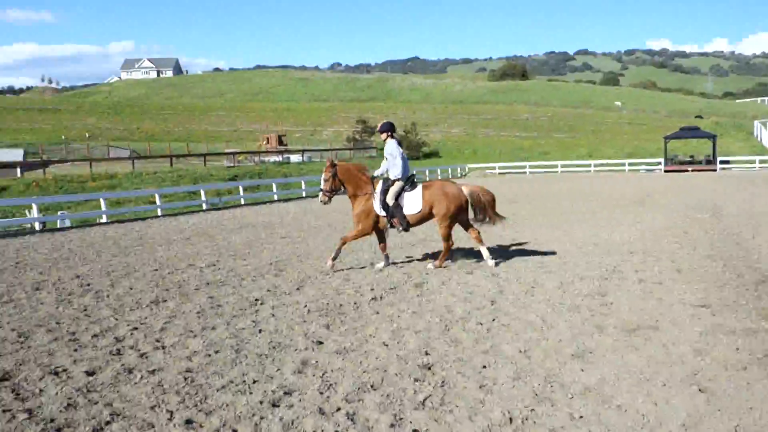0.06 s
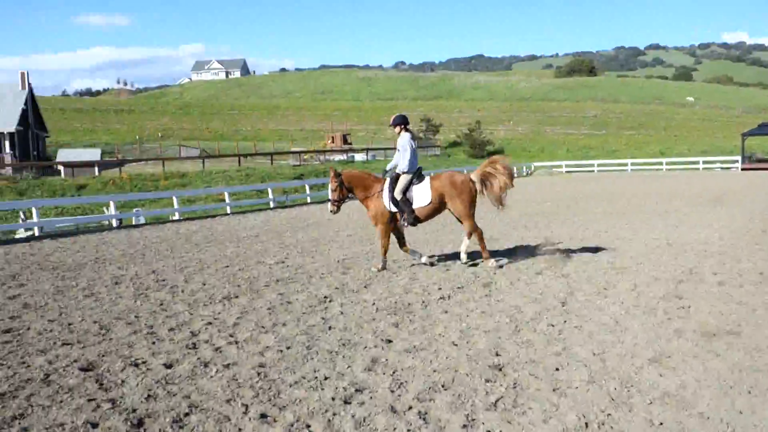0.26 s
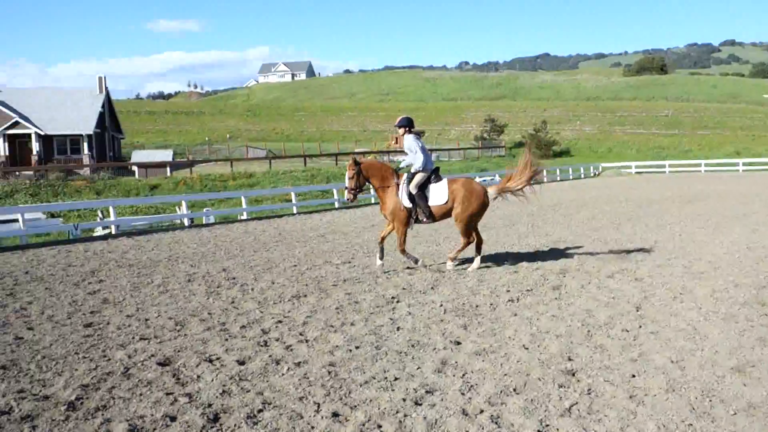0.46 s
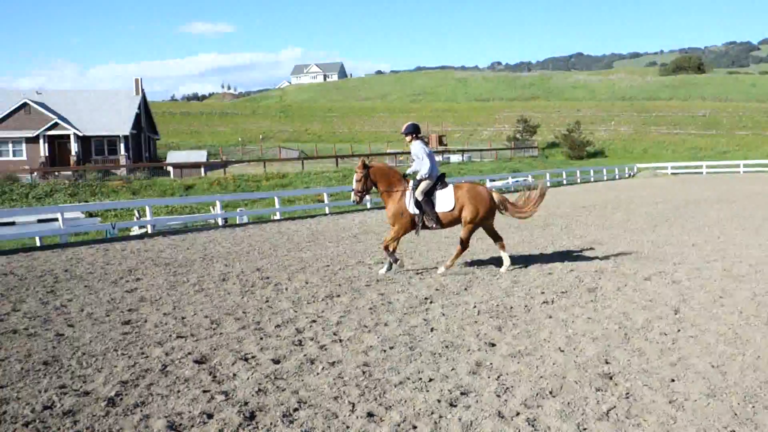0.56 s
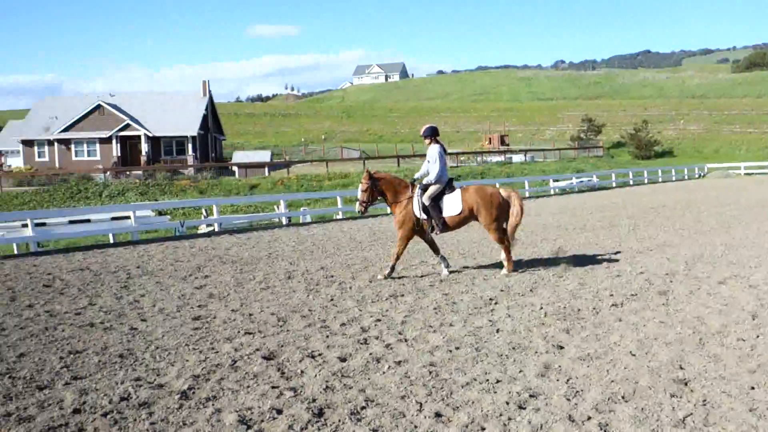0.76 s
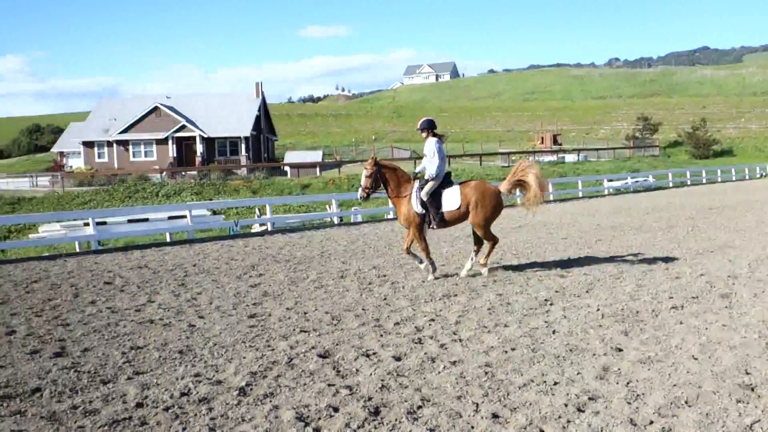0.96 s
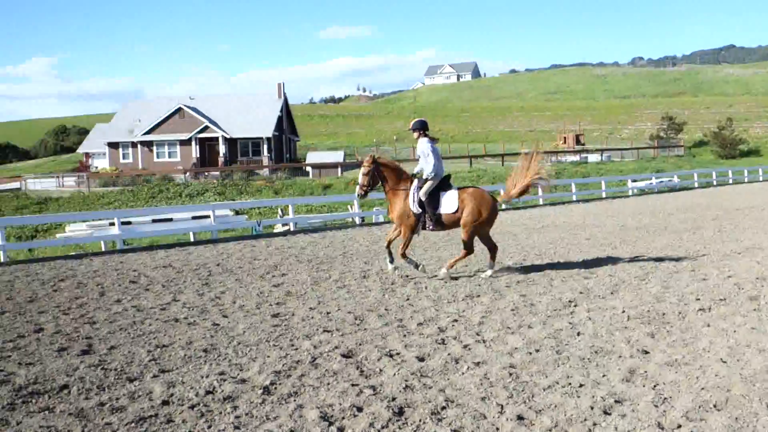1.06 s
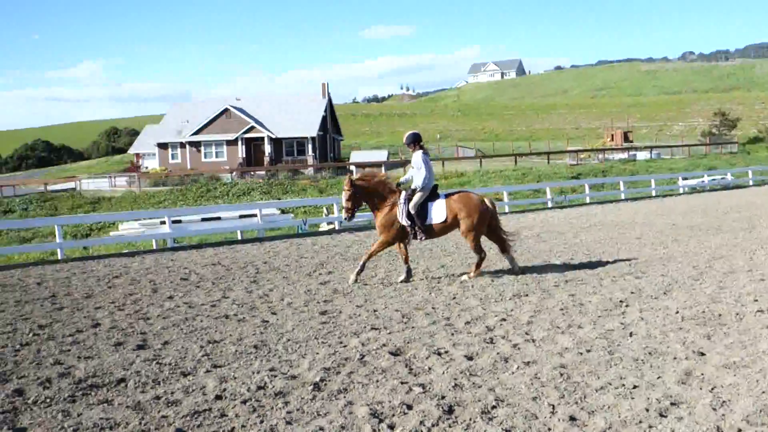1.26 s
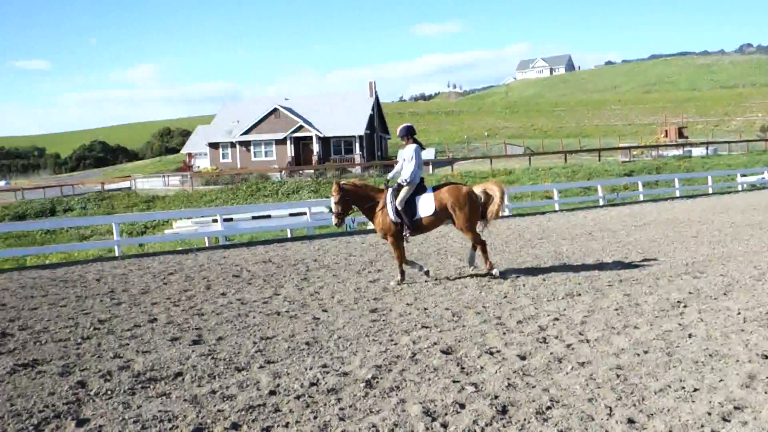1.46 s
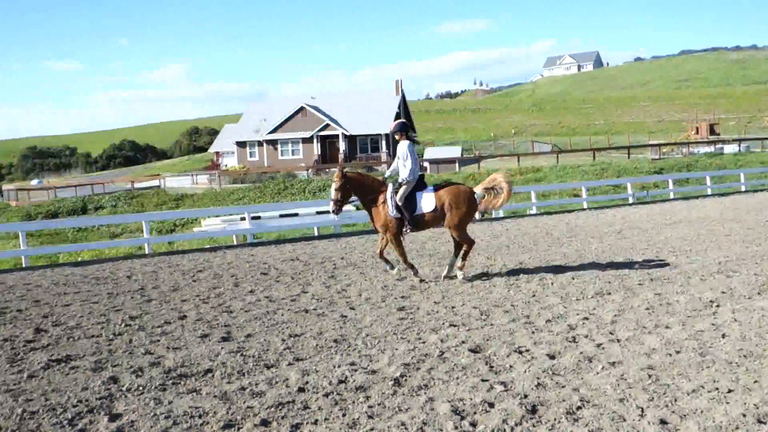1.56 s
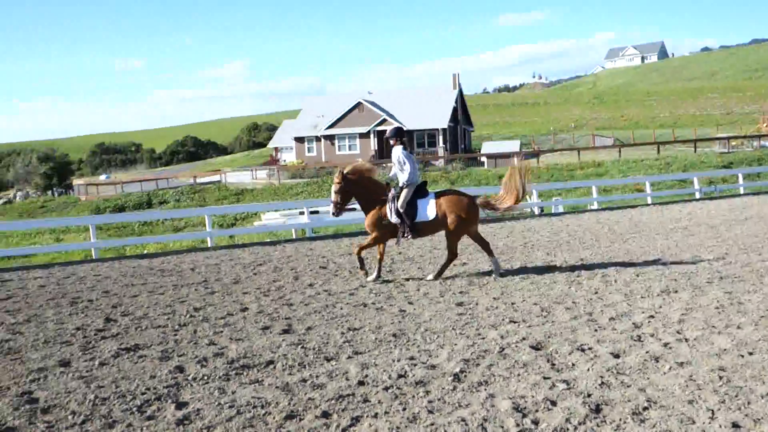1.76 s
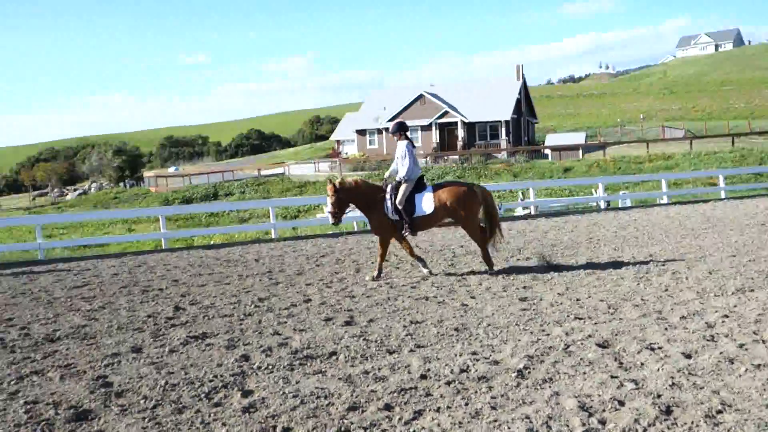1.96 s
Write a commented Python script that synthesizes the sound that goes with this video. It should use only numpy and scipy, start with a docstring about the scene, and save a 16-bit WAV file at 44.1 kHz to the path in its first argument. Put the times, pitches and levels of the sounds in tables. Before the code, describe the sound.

Outdoors, gusts slap an unprotected microphone with hollow low roar, easing midway, then returning; some distance off a cantering horse gives muffled thuds on sand, with light gritty hiss, close dry ticks and faint thin whistles.

```python
"""A sand arena in gusty wind: a pony canters round it, some way from the microphone.
Coloured noise makes the wind's roar, rumble and flutter on two microphone ports; gliding tones make it
hoot, and single pulses make it buffet. Under it hooves thud as pulses and noise bursts, and sand hisses.
Dry ticks of pulse and noise sound close by, with a ringing clack and a soft swish of noise.
Two thin wavering sine whistles, probably birds, come from far off."""
import sys
import numpy as np
from scipy import signal
from scipy.fft import rfft, irfft
from scipy.io import wavfile
from scipy.ndimage import uniform_filter1d, minimum_filter1d

SR = 44100
rng = np.random.default_rng(int(sys.argv[2]) if len(sys.argv) > 2 else 0)


def transcribe(u):
    """Save the signal u as a 16-bit wav file named by the first command-line argument.

    u: samples, shape (n,) or (channels, n), limited to [-1, 1]; the rate is SR.
    q: integer samples, one column per channel.
    """
    v = np.clip(np.atleast_2d(u).T, -1, 1)
    q = np.round(v * 32767).astype(np.int16)
    wavfile.write(sys.argv[1], SR, q)


N = 88949

# Every colour table is a spectrum shape: pitch_hz, relative_db
# Open air behind everything
AIR_COLOUR = [(60, 0.5), (400, -3), (1000, -13), (2000, -7.5), (5000, -12), (15000, -73.5)]
AIR_DB = -79.5

# Far whistles: start_s, length_s, pitch_hz (before waver), level_db (before flicker)
WHISTLES = [(0.604, 0.11, 2394, -67), (1.908, 0.15, 4780, -68.5)]
WHISTLE_WAVER, WHISTLE_FLICKER_DB = 0.062, 6  # waver: rms share of the pitch

# Sand hiss and hoof spray
SAND_COLOUR = [(900, -7.5), (1800, 3), (2900, 6), (4500, 1), (7000, 0.5), (11500, 0), (14000, -7.5),
               (16000, -13.5)]
# Sand hiss over time: time_s, level_db (before the trim)
HISS_LEVEL = [(0, -73.5), (.16, -70.5), (.23, -65), (.37, -78.5), (.58, -67.5), (.63, -62), (.71, -67.5),
              (.77, -63.5), (.83, -65), (.87, -65), (1.05, -68.5), (1.08, -55), (1.12, -62), (1.39, -57.5),
              (1.5, -64), (1.8, -64), (2.02, -57.5)]
HISS_TRIM_DB, HISS_GRAIN_DB = -5.5, 1
TREBLE_PAN_DB, TREBLE_SIDE_DB = -3.5, -5.5  # left minus right; side noise against shared noise

# One airy swish, sand or cloth; the half length runs from the middle to a fall of 1 / e
SWISH_S, SWISH_HALF_S, SWISH_DB = 0.775, 0.036, -60

# Dry ticks near the microphone: time_s, snap_peak_db, scatter_peak_db, scatter_decay_s,
# ring_share (signed ratio, before the ring's own level)
TICKS = [(.415, -43, -46.5, 0.0034, 0.5), (0.592, -39.5, -42, 0.008, 0), (0.61, -45.5, -42.5, 0.0014, -2),
         (0.64, -45.5, -43, 0.0036, .5), (.898, -45, -45, 0.0034, 0), (0.9827, -33.5, -36.5, 0.0039, 0),
         (0.987, -34, -35, .002, 0.1), (1.0416, -36, -33.5, 0.0053, 0.5),
         (1.1615, -30.5, -33.5, 0.0054, -0.12), (1.6212, -34.5, -35.5, 0.0035, 0.8),
         (1.664, -43.5, -39, 0.0026, 0), (1.746, -44.5, -38.5, .005, 1), (1.8734, -33.5, -45, 0.0024, 5)]
TICK_COLOUR = [(1200, -21), (2600, -6), (4300, -6), (6000, -2.5), (8500, -1), (12000, 0.5), (14000, -5),
               (16000, -7)]
TICK_ATTACK_S, TICK_RING_HZ, TICK_RING_WIDTH_HZ = 0.0013, 2900, 1200

# One clack, a hoof or the tack, and its rebound: start_s, peak_db
CLACKS = [(1.405, -32.5), (1.4115, -46)]
# Resonances of the clack: pitch_hz, width_hz, relative_db
CLACK_MODES = [(1140, 150, 9), (1800, 56, -1), (2247, 300, 5), (2830, 130, 13), (3280, 150, 7.5),
               (3820, 500, -4.5), (4900, 700, -13)]
CLACK_DECAY_S = 0.0022

# Hoof falls: start_s, thud_peak_db (before the lean), spray_peak_db
HOOVES = [(0.095, -49, -50), (.215, -19.5, -49), (.247, -28, -50), (0.631, -18.5, -61),
          (0.668, -18.5, -52.5), (0.753, -30.5, -66), (.822, -22, -46), (0.894, -46.5, -64),
          (0.991, -27, -70), (1.106, -29, -68), (1.264, -24.5, -46), (1.389, -21, -69),
          (1.836, -34.5, -40.5)]
THUD_COLOUR = [(15, -18), (110, -2.5), (260, 6), (450, 2), (750, -19), (1400, -51.5), (8000, -81)]
THUD_ATTACK_S, THUD_DECAY_S = 0.00303, 0.014
SPRAY_ATTACK_S, SPRAY_DECAY_S = 0.0037, 0.01

# Hollow tones drawn from the ports: start_s, length_s, first_pitch_hz, last_pitch_hz (before waver),
# level_db (before flicker)
HOOTS = [(0.033, 0.12, 384.4, 430, -27), (0.23, 0.099, 394, 350, -30), (0.308, 0.11, 254, 368.3, -22),
         (0.399, .08, 334.3, 386.5, -24.5), (0.432, .07, 216.3, 129, -24.5),
         (1.09, 0.083, 245.2, 221.7, -21.5), (1.304, 0.14, 138, 141, -27.5), (1.438, 0.15, 168, 229, -26.5),
         (1.549, 0.067, 225.3, 291, -19.5), (1.553, 0.115, 165.1, 78, -25.5), (1.637, 0.2, 105, 213.3, -25),
         (1.73, 0.073, 325, 284, -24), (1.824, 0.12, 305, 376, -25.5), (1.86, .085, 206.4, 176.6, -17.5)]
HOOT_WAVER, HOOT_FLICKER_DB, HOOT_SIDE_DB = 0.04, 3.5, -12  # waver: rms share of the pitch

# Sharp wind buffets: time_s, push_peak_db, crack_peak_db (both before the random lean)
BUFFETS = [(.006, -29, -38), (.103, -24.5, -30), (.137, -18.5, -38), (.158, -13, -31), (0.177, -13, -36),
           (.226, -20.5, -54), (.252, -19.5, -34), (.281, -13, -38), (.319, -16.5, -34),
           (.337, -18.5, -39.5), (.373, -9, -32.5), (.403, -16, -35), (.482, -20.5, -38),
           (1.546, -16, -39.5), (1.650, -17.5, -46.5), (1.684, -17, -26.5), (1.713, -22.5, -38.5),
           (1.7366, -27, -43.5), (1.751, -22.5, -37.5), (1.766, -18, -33.5), (1.775, -13, -39.5),
           (1.794, -25, -38)]
# The dull push of a buffet
BUFFET_COLOUR = [(20, -36.5), (90, -13), (300, 5.5), (520, -5), (800, -19), (1300, -41), (5000, -89.5)]
# The crack on top of it
CRACK_COLOUR = [(100, -27), (850, 7.5), (1500, 3), (2300, -10), (3100, -22.5), (7000, -32), (15000, -55.5)]

# Wind roar over time: time_s, level_db (before the trim and the brightness balance)
ROAR_LEVEL = [(0.0, -15), (0.03, -34), (0.11, -24), (0.13, -30.5), (0.18, -15.5), (0.2, -41.5),
              (0.22, -24.5), (0.36, -22), (0.48, -23), (0.5, -31), (0.59, -32), (0.61, -28), (0.68, -25),
              (0.7, -48), (0.73, -36), (0.77, -33), (0.8, -48.5), (0.82, -24.5), (0.88, -61.5), (0.9, -33),
              (0.93, -71), (0.96, -29.5), (1.0, -21.5), (1.04, -30.5), (1.09, -35.5), (1.11, -26),
              (1.15, -21), (1.17, -28), (1.32, -31), (1.41, -28.5), (1.5, -28.5), (1.58, -26.5),
              (1.62, -30.5), (1.77, -20), (1.81, -23.5), (1.89, -20.5), (1.94, -21), (1.96, -13),
              (2.02, -25)]
ROAR_COLOUR = [(20, -52.5), (60, -24.5), (120, -10), (180, 2), (260, -0.5), (370, -3), (480, -9),
               (620, -20.5), (800, -31.5), (1300, -53), (5000, -85.5)]
# Lift of the roar's upper part: time_s, lift_db (before the brightness balance)
BRIGHTNESS = [(0, 5), (.09, 10), (.22, 0), (.37, 11), (.46, -1.5), (.82, -1), (1.0, 4.5), (1.14, 0.5),
              (1.35, -4.5), (1.62, -5.5), (1.76, -3), (2.02, 2)]
BRIGHT_HZ = 340
# The wind's deepest rumble over time: time_s, level_db (before the trim)
RUMBLE_LEVEL = [(0, -41.5), (.045, -26), (.075, -36), (.125, -26), (.18, -32), (.215, -29.5), (.28, -26.5),
                (.35, -33), (.41, -35.5), (.49, -30), (.54, -27.5), (.58, -55), (.61, -28.5), (.68, -22.5),
                (.705, -45.5), (.8, -43), (.83, -24), (.86, -47.5), (.93, -47.5), (.97, -29.5),
                (1.0, -17.5), (1.05, -39.5), (1.13, -32.5), (1.2, -41.5), (1.3, -27.5), (1.36, -30.5),
                (1.48, -27), (1.74, -28.5), (1.86, -30.5), (2.02, -29)]
RUMBLE_COLOUR = [(12, -36.5), (30, -21.5), (55, -9), (90, -2.5), (130, 0), (175, -4.5), (260, -41.5),
                 (900, -81.5)]
# The wind's rough upper edge over time: time_s, level_db (before trims and pan)
FLUTTER_LEVEL = [(0, -44), (.06, -75), (.11, -45), (.14, -64), (.17, -39), (.195, -58.5), (.24, -59),
                 (.29, -42.5), (.36, -53.5), (.42, -57.5), (.46, -62.5), (.485, -45.5), (.51, -66.5),
                 (.59, -79), (.64, -58), (.68, -58), (.71, -79), (.76, -66), (.8, -84), (.825, -68),
                 (.86, -79), (.94, -78), (.985, -51.5), (1.06, -70.5), (1.14, -58), (1.21, -64),
                 (1.45, -66.5), (1.55, -52), (1.63, -64.5), (1.70, -51.5), (1.77, -47.5), (1.83, -54.5),
                 (2.02, -47)]
FLUTTER_COLOUR = [(100, -41), (500, -1.5), (700, -8), (900, -2), (1250, -6), (1800, -13.5), (3000, -37),
                  (12000, -67.5)]
# Pops inside the flutter
CRACKLE_COLOUR = [(100, -33), (600, 6.5), (900, 1), (1300, -1.5), (1900, -17), (2600, -24.5), (4000, -31.5),
                  (12000, -68)]
# Difference between the two ports: pitch_hz, side_minus_mid_db
PORT_SIDE = [(30, -22), (80, -17.5), (170, -14), (340, -5.5), (700, -3.5), (1400, 0)]
ROAR_TRIM_DB, RUMBLE_TRIM_DB, FLUTTER_TRIM_DB, CRACKLE_TRIM_DB = 1, -1, -11.5, -0.5
EDDY_RATE_HZ, EDDY_SPREAD_DB, FLUTTER_SPREAD_DB, STEADY_S = 110, 3, 8, 0.03
CRACKLE_RATE_HZ, CRACKLE_SPREAD_DB = 130, 4.5  # mean pops a second in each of three streams
FLUTTER_PAN_DB = 3  # left minus right
PORT_LAG_S = 0.00033  # eddies reach the right port first

CEILING, TOP_HZ = 0.31, 15800  # limiter threshold in full scale; low-pass edge


def undb(db):
    """Decibels to gain."""
    return 10 ** (np.asarray(db) / 20)


def seconds():
    """The time of every sample."""
    return np.arange(N) / SR


def curve(rows):
    """Gain along (time_s, level_db) points."""
    return undb(np.interp(seconds(), *np.array(rows).T))


def gains(points):
    """Gain at every frequency from (pitch_hz, level_db) points."""
    hz, db = np.array(points).T
    bins_hz = np.fft.rfftfreq(N, 1 / SR)
    return undb(np.interp(np.log(bins_hz + 1), np.log(hz), db))


def colour(x, points):
    """Filter to a spectrum shape, keeping the power of white noise."""
    g = gains(points)
    return irfft(rfft(x) * g / np.sqrt(np.mean(g ** 2)), N)


def walk(rate_hz):
    """Random levels held 1 / rate_hz and smoothed twice, with unit deviation."""
    hold = max(int(SR / rate_hz), 1)
    steps = rng.standard_normal(N)[np.arange(N) // hold]
    smooth = uniform_filter1d(uniform_filter1d(steps, hold), hold)
    return smooth / smooth.std()


def burst(start_s, attack_s, decay_s):
    """A linear rise and an exponential fall."""
    age = seconds() - start_s
    return np.clip(age / attack_s, 0, 1) * np.exp(-np.maximum(age - attack_s, 0) / decay_s)


def peak(x, db):
    """Scale to a peak level."""
    return x * undb(db) / np.abs(x).max()


def pan(db):
    """Left and right gains that differ by db."""
    return undb(np.array([[db], [-db]]) / 2)


def slap(time_s, points, db, lean):
    """One pressure pulse swinging both ways about time_s, unequal on the two ports."""
    delay = np.exp(-2j * np.pi * np.fft.rfftfreq(N, 1 / SR) * time_s)
    pulse = irfft(gains(points) * delay * 1j, N)
    return peak(pulse, db) * (1 + lean * np.array([[1], [-1]]))


def ring(x, modes):
    """Pass through damped (pitch_hz, width_hz, relative_db) resonances of alternating sign."""
    hz = np.fft.rfftfreq(N, 1 / SR)
    body = 0
    for k, (pitch_hz, width_hz, db) in enumerate(modes):
        body = body + (-1) ** k * undb(db) / (1 + 2j * (hz - pitch_hz) / width_hz)
    return irfft(rfft(x) * body, N)


def port_noise():
    """Noise on two ports, alike in the bass and more unlike higher up."""
    mid, side = rng.standard_normal((2, N))
    side = irfft(rfft(side) * gains(PORT_SIDE), N)
    return np.array([mid + side, mid - side])


def treble_noise():
    """Mostly shared noise that leans to the right."""
    mid, side = rng.standard_normal((2, N))
    side = side * undb(TREBLE_SIDE_DB)
    return np.array([mid + side, mid - side]) * pan(TREBLE_PAN_DB)


def open_air():
    """A faint steady bed of coloured noise."""
    return colour(port_noise(), AIR_COLOUR) * undb(AIR_DB)


def whistles():
    """Thin far-off sine notes that waver in pitch and flicker in level."""
    out = 0
    for start_s, length_s, pitch_hz, db in WHISTLES:
        along = np.clip((seconds() - start_s) / length_s, 0, 1)
        arch = np.sqrt(np.abs(np.sin(np.pi * along)))
        level = arch * undb(db + WHISTLE_FLICKER_DB * np.tanh(walk(140)))
        hz = pitch_hz * (1 + WHISTLE_WAVER * walk(400))
        out = out + level * np.sin(2 * np.pi * np.cumsum(hz) / SR)
    return out


def sand_hiss():
    """Fine grains scatter and settle: bright noise with a grainy level."""
    grains = treble_noise() * undb(HISS_GRAIN_DB * walk(360))
    return colour(grains, SAND_COLOUR) * curve(HISS_LEVEL) * undb(HISS_TRIM_DB)


def swish():
    """A bright rustle of noise swells and fades."""
    swell = np.exp(-((seconds() - SWISH_S) / SWISH_HALF_S) ** 2)
    return colour(treble_noise(), TICK_COLOUR) * swell * undb(SWISH_DB)


def ticks(grain_db=6):
    """Each tick is one sharp snap inside a scatter of tiny slips; some ring a little."""
    slips = colour(treble_noise() * undb(grain_db * np.tanh(walk(3000))), TICK_COLOUR)
    modes = [(TICK_RING_HZ, TICK_RING_WIDTH_HZ, 9)]
    out = 0
    for time_s, snap_db, scatter_db, decay_s, ring_share in TICKS:
        snap = slap(time_s, TICK_COLOUR, 0, -0.15)
        scatter = slips * burst(time_s - TICK_ATTACK_S, 2 * TICK_ATTACK_S, decay_s)
        for x, db in (snap, snap_db), (scatter, scatter_db):
            out = out + peak(x + ring_share * ring(x, modes), db)
    return out


def clack():
    """A short hard contact rings a few damped modes and rebounds once."""
    contact = treble_noise()
    out = 0
    for start_s, db in CLACKS:
        hit = contact * burst(start_s, TICK_ATTACK_S, CLACK_DECAY_S)
        out = out + peak(ring(hit, CLACK_MODES), db)
    return out


def hooves(grain_db=3.0, slide_db=-4, lean=0.088):
    """Each hoof thumps the soft footing, sinks in and throws a spray of sand."""
    ground = port_noise()
    sand = colour(treble_noise() * undb(grain_db * walk(600)), SAND_COLOUR)
    out = 0
    for start_s, thud_db, spray_db in HOOVES:
        sink = colour(ground * burst(start_s, THUD_ATTACK_S, THUD_DECAY_S), THUD_COLOUR)
        spray = sand * burst(start_s, SPRAY_ATTACK_S, SPRAY_DECAY_S)
        out = out + slap(start_s + THUD_ATTACK_S, THUD_COLOUR, thud_db, lean)
        out = out + peak(sink, thud_db + slide_db)
        out = out + peak(spray, spray_db)
    return out


def hoots():
    """Air sweeping over the ports sheds vortices: short low tones that glide and waver."""
    out = 0
    for start_s, length_s, first_hz, last_hz, db in HOOTS:
        along = np.clip((seconds() - start_s) / length_s, 0, 1)
        hz = (first_hz + (last_hz - first_hz) * along) * (1 + HOOT_WAVER * walk(90))
        phase = 2 * np.pi * np.cumsum(hz) / SR
        level = np.sin(np.pi * along) * undb(db + HOOT_FLICKER_DB * walk(60))
        side = undb(HOOT_SIDE_DB) * walk(50) * np.cos(phase)
        out = out + level * (np.sin(phase) + side * np.array([[1], [-1]]))
    return out


def buffets(lean=0.73):
    """Single eddies slap the ports: a dull push with a crack on top."""
    leans = lean * rng.standard_normal(len(BUFFETS))
    out = 0
    for (time_s, push_db, crack_db), tilt in zip(BUFFETS, leans):
        out = out + slap(time_s, BUFFET_COLOUR, push_db, tilt)
        out = out + slap(time_s, CRACK_COLOUR, crack_db, tilt)
    return out


def turbulence(points, spread_db):
    """Pressure of passing eddies: uneven from moment to moment, steady on average."""
    x = colour(port_noise() * undb(spread_db * walk(EDDY_RATE_HZ)), points)
    size = int(STEADY_S * SR) + 1
    power = uniform_filter1d(uniform_filter1d(x.mean(0) ** 2, size), size)
    return x / np.sqrt(power)


def crackle(shared=0.44):
    """Small eddies break as separate pops, some on one port and some on both."""
    pops = (rng.random((3, N)) < CRACKLE_RATE_HZ / SR) * np.sign(rng.standard_normal((3, N)))
    pops = pops * undb(CRACKLE_SPREAD_DB * np.tanh(rng.standard_normal((3, N))))
    x = colour(pops[:2] + shared * pops[2], CRACKLE_COLOUR)
    return x / x.mean(0).std()


def roar():
    """Hollow noise of the gusts, its upper part lifted and its whole level balanced in return."""
    x = turbulence(ROAR_COLOUR, EDDY_SPREAD_DB)
    high_pass = gains([(BRIGHT_HZ / 2, -30), (BRIGHT_HZ, -5), (2 * BRIGHT_HZ, 0)])
    upper = irfft(rfft(x) * high_pass, N)
    lift = curve(BRIGHTNESS)
    x = x + upper * (lift - 1)
    return x * curve(ROAR_LEVEL) * undb(ROAR_TRIM_DB) / np.sqrt(lift)


def wind():
    """A hollow roar, a deep rumble and a rough, crackling flutter, each with its own level curve."""
    body = roar()
    rumble = turbulence(RUMBLE_COLOUR, EDDY_SPREAD_DB) * curve(RUMBLE_LEVEL) * undb(RUMBLE_TRIM_DB)
    edge = turbulence(FLUTTER_COLOUR, FLUTTER_SPREAD_DB) * undb(FLUTTER_TRIM_DB)
    edge = edge + crackle() * undb(CRACKLE_TRIM_DB)
    return body + rumble + edge * curve(FLUTTER_LEVEL) * pan(FLUTTER_PAN_DB)


def across_ports(x):
    """The air meets one port a moment before the other."""
    hz = np.fft.rfftfreq(N, 1 / SR)
    turn = np.exp(1j * np.pi * hz * PORT_LAG_S * np.array([[-1], [1]]))
    return irfft(rfft(x) * turn, N)


def scene():
    """Wind in front, the pony and the open air behind."""
    air = open_air()
    edges = np.clip(np.minimum(seconds(), seconds()[::-1]) / 0.002, 0, 1)  # 2 ms fades
    gusts = across_ports((wind() + buffets() + hoots()) * edges)
    arena = hooves() + sand_hiss() + swish() + ticks() + clack()
    return gusts + arena + whistles() + air


def record(dry, size=441):
    """A limiter holds down the strongest peaks on both channels; a low-pass cuts the top."""
    gain = np.minimum(1, CEILING / (np.abs(dry).max(0) + 1e-9))
    gain = minimum_filter1d(gain, 2 * size)
    gain = uniform_filter1d(uniform_filter1d(gain, size), size)
    low_pass = signal.ellip(8, 0.2, 70, TOP_HZ, fs=SR, output="sos")
    return signal.sosfilt(low_pass, dry * gain)


dry = scene()
out = record(dry)
transcribe(out)
```